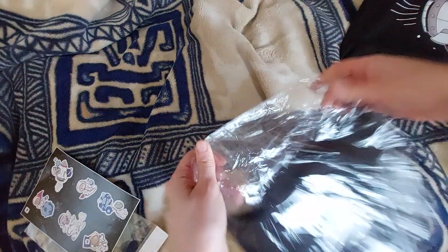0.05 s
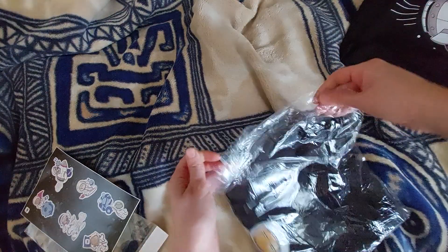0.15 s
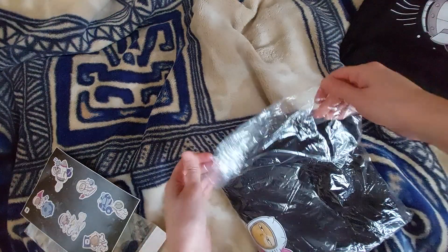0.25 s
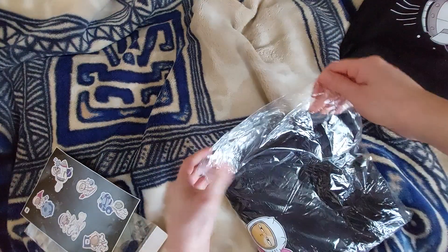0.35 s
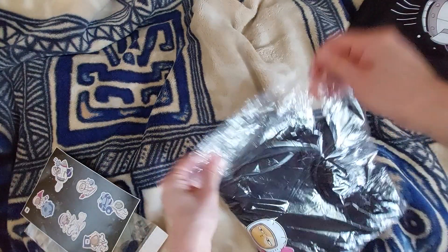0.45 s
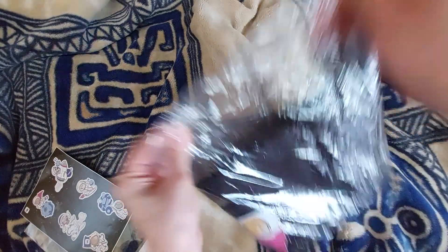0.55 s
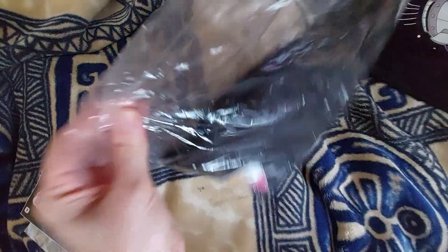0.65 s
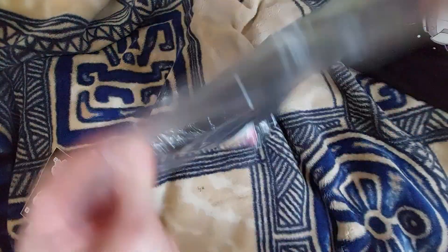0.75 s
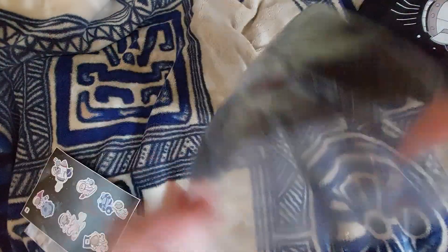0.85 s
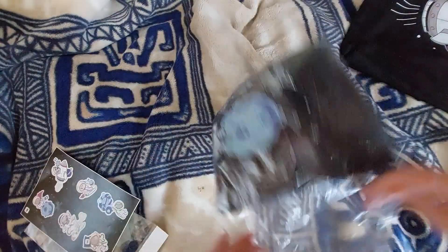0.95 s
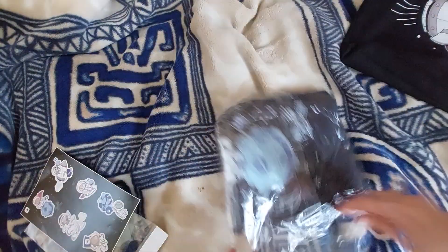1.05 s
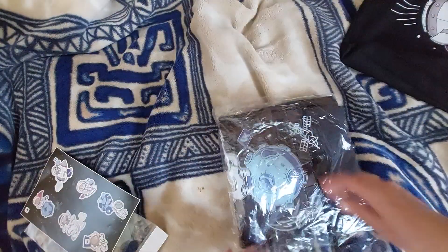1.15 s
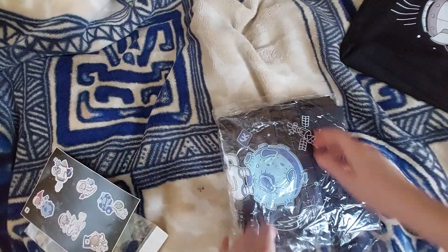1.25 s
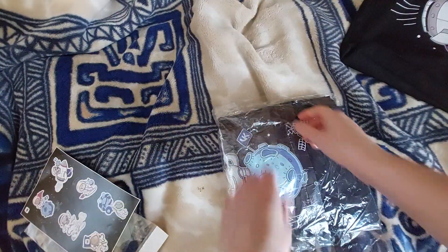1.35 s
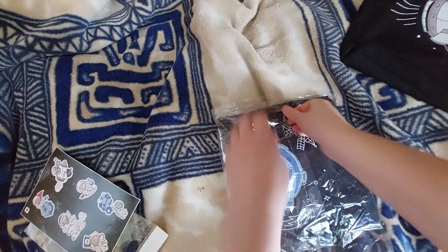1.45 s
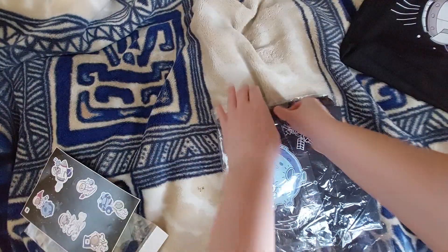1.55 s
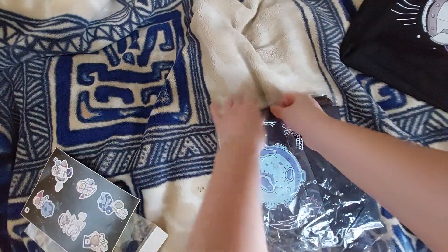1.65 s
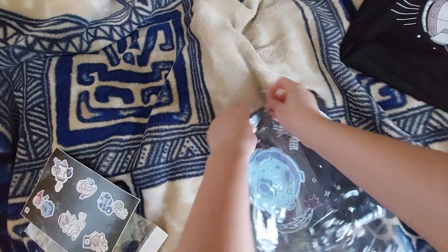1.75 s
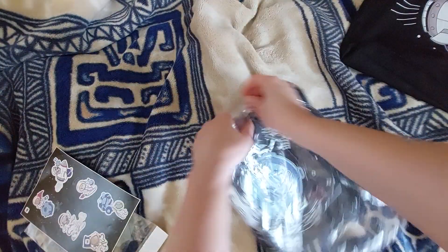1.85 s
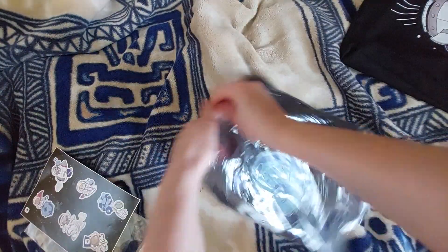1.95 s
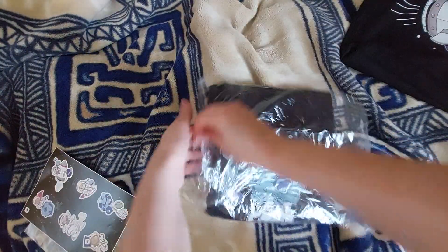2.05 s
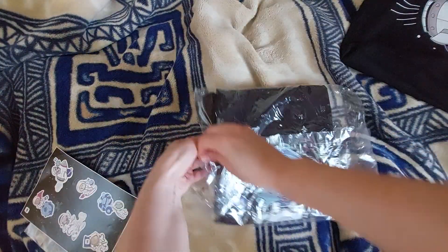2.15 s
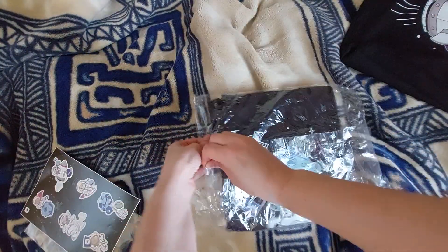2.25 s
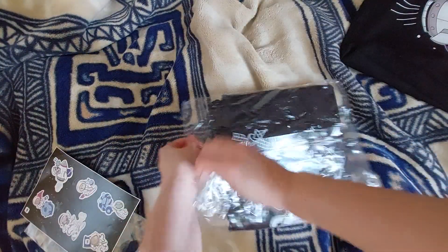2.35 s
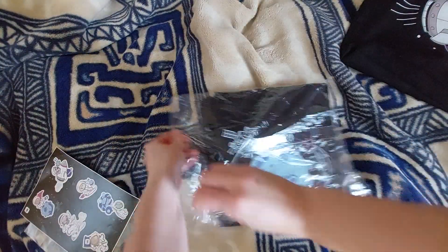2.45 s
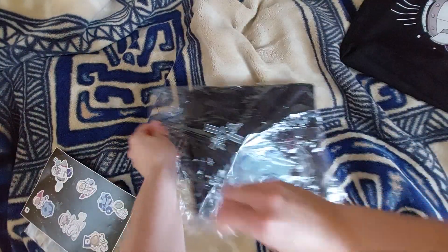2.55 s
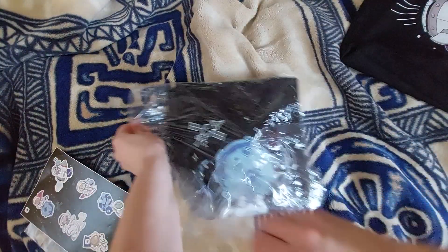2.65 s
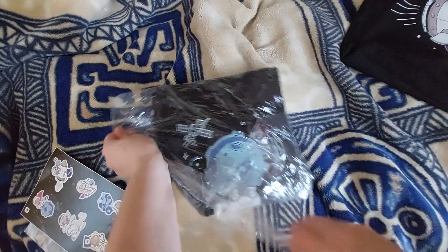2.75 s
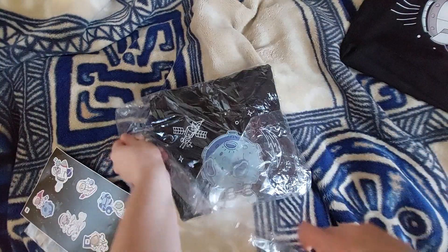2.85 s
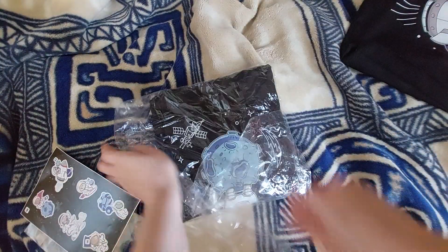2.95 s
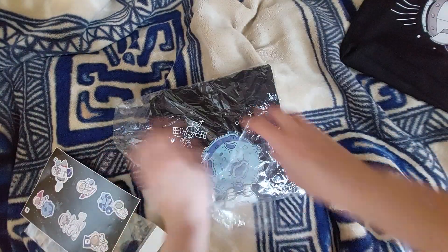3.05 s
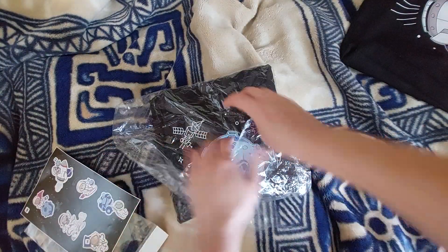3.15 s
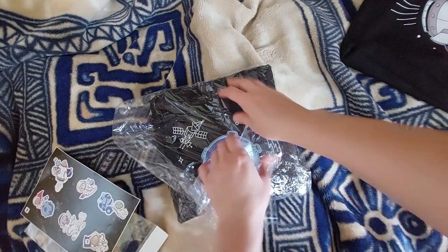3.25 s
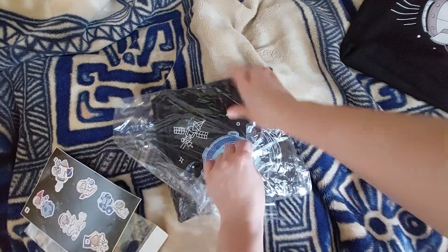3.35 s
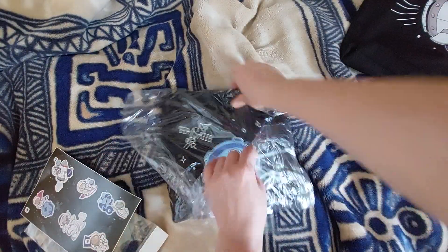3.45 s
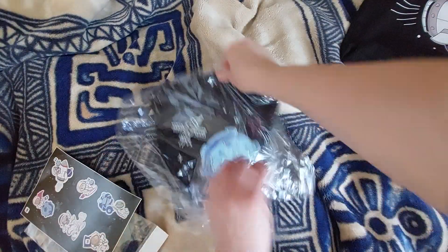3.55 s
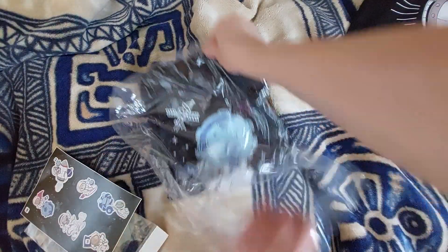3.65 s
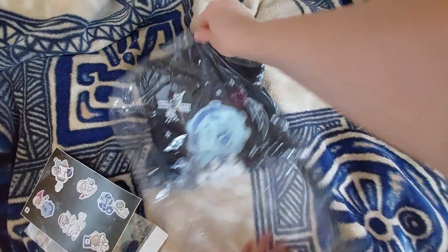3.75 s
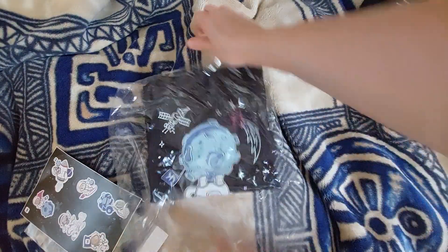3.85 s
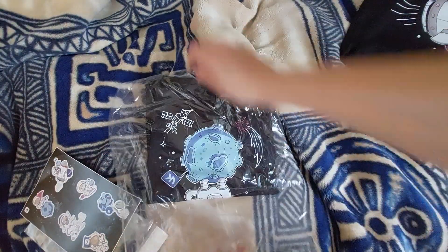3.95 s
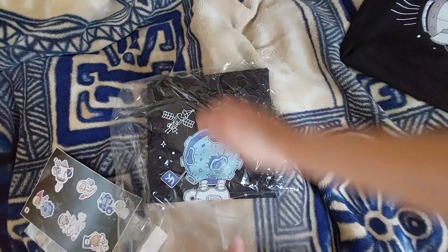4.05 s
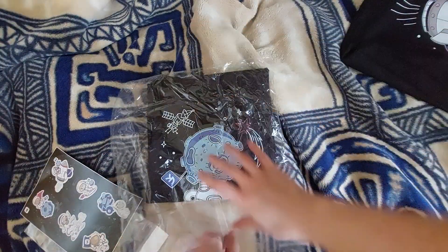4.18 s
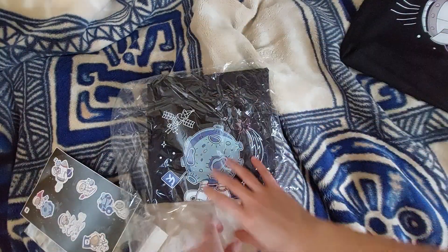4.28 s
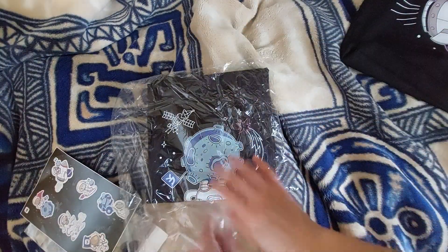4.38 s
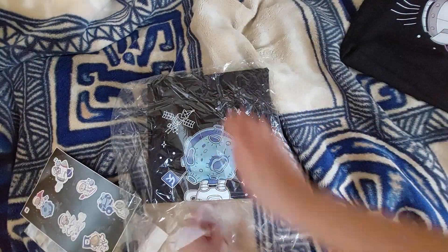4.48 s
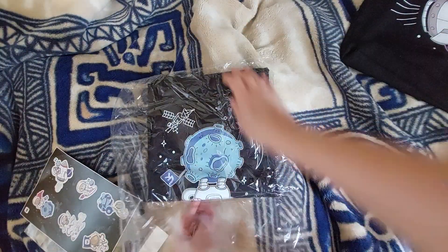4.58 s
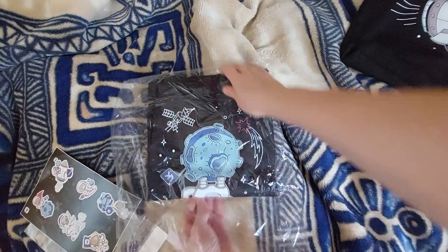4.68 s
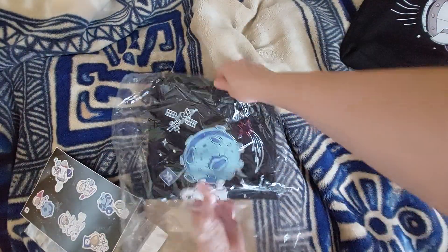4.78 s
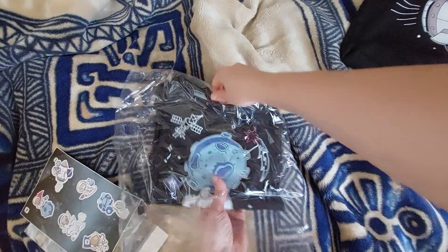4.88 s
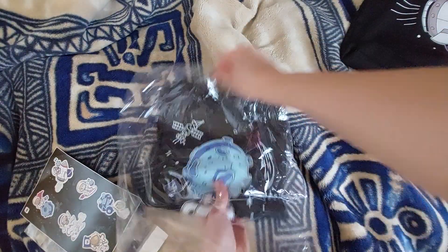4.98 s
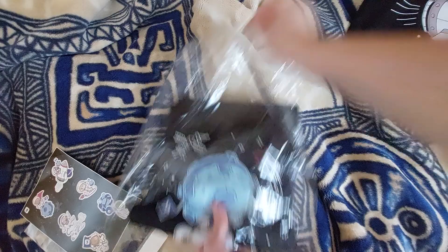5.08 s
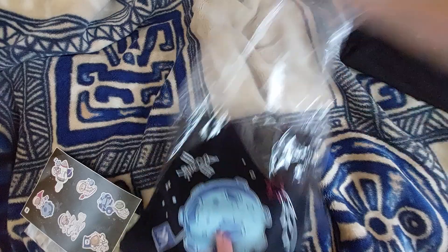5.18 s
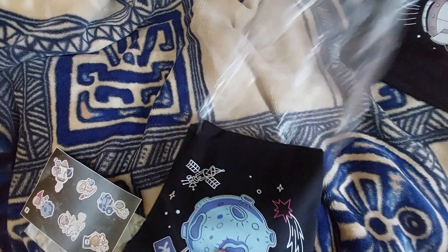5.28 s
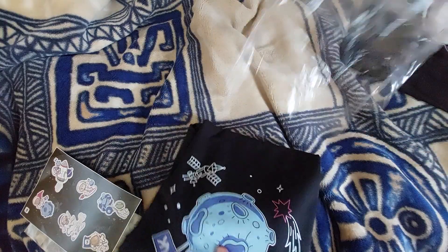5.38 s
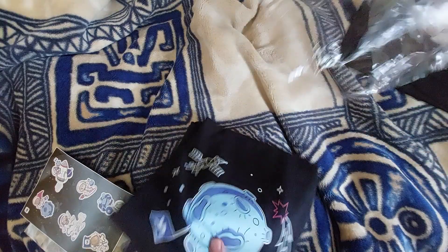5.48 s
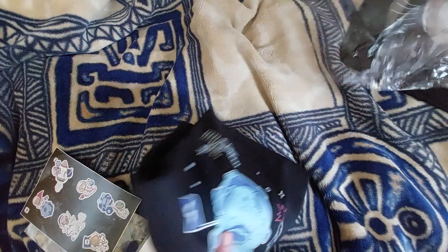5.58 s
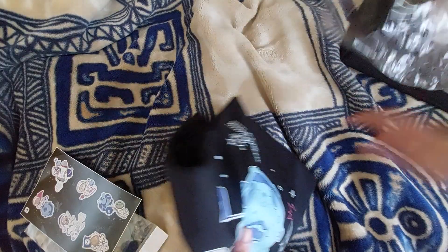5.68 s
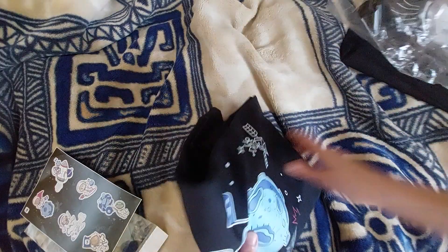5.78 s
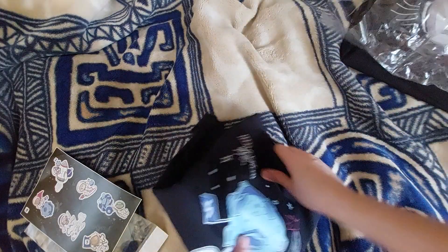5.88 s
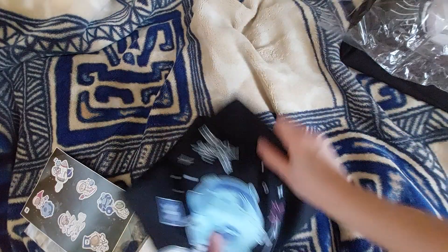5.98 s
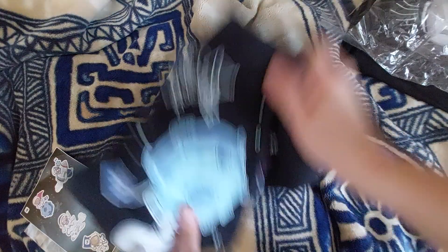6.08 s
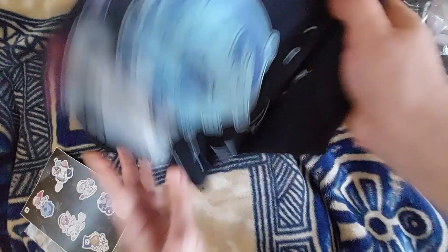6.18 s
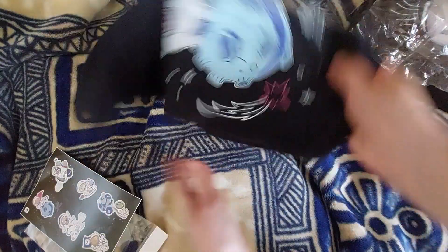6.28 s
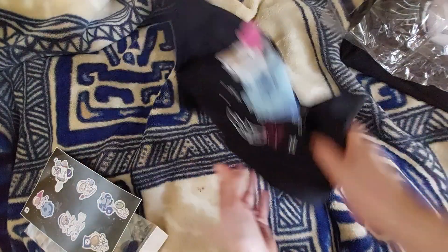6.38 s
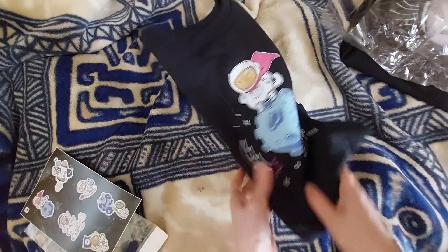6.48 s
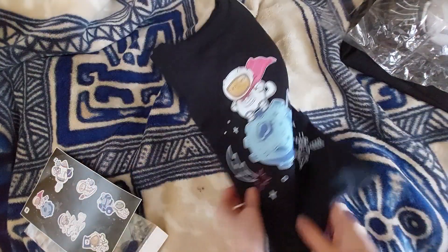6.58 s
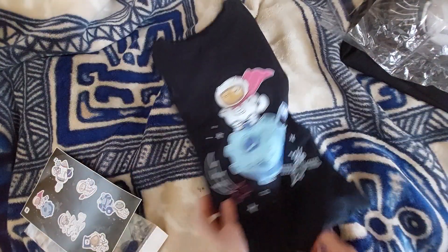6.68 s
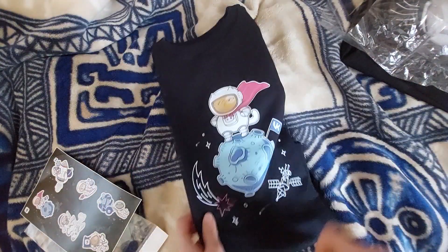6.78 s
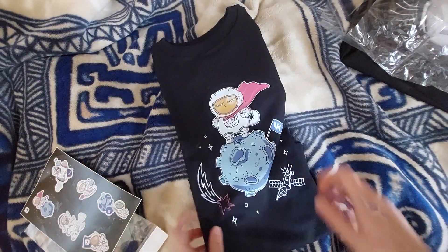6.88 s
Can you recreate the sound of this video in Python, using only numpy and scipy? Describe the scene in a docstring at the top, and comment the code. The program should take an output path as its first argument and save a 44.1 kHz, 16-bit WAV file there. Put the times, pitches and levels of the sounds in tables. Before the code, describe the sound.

Hands turn a thin plastic bag over on a bed, making bright, irregular crinkling with some sliding hiss. The glued flap peels open with a hollow pop and a cluster of sharp snaps. More tugging and lighter rustling follow as a shirt is drawn out. The crinkling dies away and the shirt is shaken open with soft, dull flaps and puffs of air. The sound is close and in stereo, in a small, damped bedroom.

```python
"""Unpacking a shirt

Hands turn a thin plastic bag over on a bed, pull a shirt out of it and shake the shirt open.
Creases buckle in clumps of tiny clicks, with single snaps and ticks from loud to faint; film slides
on film, broad folds flap and the glued flap pops open. Bag and cloth push soft puffs of air
at two close microphones in a small, damped bedroom."""
import sys
import numpy as np
from scipy import signal
from scipy.fft import rfft, irfft
from scipy.io import wavfile
from scipy.ndimage import uniform_filter1d, map_coordinates

SR = 44100
rng = np.random.default_rng(int(sys.argv[2]) if len(sys.argv) > 2 else 0)


def store_wav(level_fs):
    """Save 16-bit WAV to argv[1]."""
    pcm = np.round(np.clip(np.atleast_2d(level_fs), -1, 1) * 32767)
    wavfile.write(sys.argv[1], SR, pcm.T.astype(np.int16))


N = 305613
TIME = np.arange(N) / SR


def amp(db):
    """Turns decibels into a gain."""
    return 10 ** (np.asarray(db) / 20)


def unit(x):
    """Scales a signal to an average (rms) level of 1."""
    return x / np.sqrt(np.mean(x ** 2) + 1e-20)


def look_up(table, hz):
    """Reads between the rows of a table, along a log-frequency axis."""
    f, value = np.transpose(table)
    return np.interp(np.log(hz + 1), np.log(f + 1), value)


def colour(x, tone, size=2048):
    """Filters with the shape of a tone table, not its overall level; clicks keep their sharp start."""
    log_gain = np.log(amp(look_up(tone, abs(np.fft.fftfreq(size, 1 / SR)))))
    taps = np.fft.ifft(np.exp(signal.hilbert(log_gain).conj())).real
    return signal.oaconvolve(x, taps[None] / np.linalg.norm(taps), axes=1)[:, :x.shape[1]]


def drift(rate_hz):
    """A smooth random wobble, mostly slower than rate_hz."""
    hz = np.fft.rfftfreq(N, 1 / SR)
    return unit(irfft(rfft(rng.standard_normal(N)) / (1 + (hz / rate_hz) ** 2), N))


def steady(x, seconds):
    """Evens out slow changes of level and leaves the fine grain."""
    size = max(int(seconds * SR), 8)
    power = uniform_filter1d(uniform_filter1d((x ** 2).mean(0), size), size)
    return x / np.sqrt(abs(power) + 1e-9)


def add(mix, start_s, sound):
    """Mixes a stereo sound in at the given time."""
    part = mix[:, max(round(start_s * SR), 0):][:, :sound.shape[1]]
    part += sound[:, :part.shape[1]]


def noise(likeness, size=N):
    """Left and right noise, from unrelated (likeness 0) to the same (1)."""
    a, b = rng.standard_normal((2, size))
    return np.array([a, likeness * a + np.sqrt(1 - likeness ** 2) * b])


# Tone of the quiet room: f/Hz, level/dB
BACKGROUND_TONE = [(15, -16.5), (40, -10.5), (80, 8), (160, -6), (330, -1.5), (600, -16), (1200, -13),
                   (3000, -34.5), (15500, -27)]
def background(level_db=-68.5):
    """The room's faint, steady rumble and hiss."""
    return amp(level_db) * unit(colour(noise(0.43), BACKGROUND_TONE))


# How long the echo takes to fade by 60 dB: f/Hz, fade/s
ECHO_FADE = [(100, 0.15), (1000, 0.24), (5000, 0.039), (16000, 0.18)]
def bedroom(x, echo_db=-16.5, first_echo_s=0.012):
    """The walls add a short, weak echo that dies fastest in the treble."""
    hz, t, spectrum = signal.stft(noise(0.11, size=SR // 2), SR, nperseg=256)
    fade = amp(-60 * t / look_up(ECHO_FADE, hz)[:, None])
    tail = signal.istft(spectrum * fade, SR, nperseg=256)[1]
    tail *= np.arange(tail.shape[1]) > first_echo_s * SR
    return x + amp(echo_db) * signal.fftconvolve(x, tail / np.linalg.norm(tail[0]), axes=1)[:, :N]


# How far right the bag is, as the delay at the left microphone: t/s, delay/ms
BAG_PATH = [(0, 0.33), (.9, 0.34), (1.5, 0.25), (2.3, 0.1), (2.6, 0.11), (3.0, 0.14), (3.4, 0.16),
            (4.3, 0.18), (4.7, 0.065), (5.3, 0.11), (5.6, 0.49), (6.9, 0.24)]
def place(x, pan_db_per_ms=-12):
    """A bag further right is later and weaker at the left microphone."""
    delay_ms = np.interp(TIME, *np.transpose(BAG_PATH))
    left = map_coordinates(x[0], [np.arange(N) - delay_ms * SR / 1000], order=5)
    return np.array([left, x[1]]) * side_gains(pan_db_per_ms)


def side_gains(pan_db_per_ms):
    """Left and right gains that favour the microphone nearer the bag."""
    pan_db = pan_db_per_ms * np.interp(TIME, *np.transpose(BAG_PATH))
    return amp(np.array([pan_db, -pan_db]) / 2)


# Hand moves: turn the bag over, peel it open (2.3 s), tug (3.2 s), reach in (4.1 s),
# draw it off (4.7 s), shake the shirt (6.2 s). Rise and fall are the times to change by swell_db.
# t/s, hold/s, rise/s, fall/s, level/dB, extra folds/dB, extra air/dB, brightness/dB, sliding share/0-1
HAND_MOVES = [(0.0, 0.039, 0.051, 0.078, -34, 3.5, -2, 2.5, 0.35),
              (.147, 0.054, 0.082, 0.06, -26.5, 2.5, -2, 2, 0.63),
              (0.22, 0.059, 0.065, 0.25, -33.5, -5, 0.5, 2.5, 0.28),
              (0.485, 0.12, 0.17, 0.05, -34.5, 2, 3.5, 4.5, 0.21),
              (0.767, .11, 0.21, 0.085, -33.5, -2, 3, 3, 0.17),
              (0.91, 0.16, 0.14, 0.16, -36.5, 7, -3, 5, 0.22),
              (1.091, 0.043, 0.085, 0.061, -30, 3.5, -1, 3.5, 0.75),
              (1.179, 0.046, 0.025, 0.1, -39.5, -0.5, -5, 2, 0.33),
              (1.255, 0.071, 0.033, .025, -50, 1.5, 2, 1, .3),
              (1.457, 0.21, 0.19, .04, -48.5, 0.5, -2, 1, 0.1),
              (1.744, 0.22, 0.22, 0.054, -37, 1, -3.5, 1, 0.58),
              (2.065, 0.099, 0.37, 0.16, -36, 2.5, -2.5, 0, 0.33),
              (2.287, 0.16, 0.14, 0.091, -30, -0.5, -8, 3, 0.17),
              (2.353, 0.13, 0.0081, 0.042, -22.5, -1.5, -4, -5.5, 0.22),
              (2.512, .1, 0.01, 0.11, -24, -5, -5.5, 5.5, .25),
              (2.646, 0.069, 0.079, .125, -21, -5.5, -7, 5, 0.48),
              (2.794, 0.13, 0.093, 0.12, -40, 1.5, 1.5, 2, 0.35),
              (3.031, 0.056, .225, 0.14, -50.5, 1.5, -9, 1, 0.33),
              (3.214, .025, 0.054, 0.1, -47.5, -6, -9, 1, .4),
              (3.338, 0.42, 0.13, .064, -40, -2.5, -8, 1.5, 0.46),
              (3.546, 0.031, 0.054, 0.064, -21.5, -4, -10, -1.5, 0.4),
              (3.628, .018, .035, 0.019, -25, -0.5, -2, -1.5, 0.2),
              (3.71, .23, 0.2, 0.13, -38, 2, 3, 1, 0.34),
              (4.111, 0.0085, 0.022, 0.073, -52, 4, -4, 0, 0.06),
              (4.192, 0.14, 0.011, 0.13, -45, 2, 2.5, 2.5, 0.23),
              (4.529, 0.037, 0.042, 0.051, -56.5, 6, -1, -4, 0.23),
              (4.716, 0.19, 0.081, 0.1, -39, 0.5, -6, 1, 0.16),
              (4.856, 0.17, 0.06, 0.33, -37.5, 4.5, -4, 3.5, 0.44),
              (5.061, 0.17, 0.1, 0.16, -29.5, 1.5, 0.5, -1, 0.45),
              (5.28, 0.068, 0.14, 0.081, -33.5, -0.5, -1, 0.5, 0.2),
              (5.466, 0.086, 0.018, 0.12, -41, 0.5, 0, 0.5, 0.33),
              (5.659, 0.042, 0.018, .05, -50.5, -3, 1, -3.5, 0.34),
              (5.779, 0.039, 0.047, 0.17, -48, -2, 1.5, -1.5, 0.4),
              (6.166, .028, 0.097, 0.021, -53.5, -2, 11, 5, 0.56),
              (6.367, 0.34, .25, 0.16, -67.5, 2.5, 13.5, 5, 0.93)]
def hands(swell_db=20, rest_db=-81.5, steps=3500):
    """Blends the moves into curves of level, folds, air, brightness and sliding; the strongest leads."""
    t = np.linspace(0, N / SR, steps)
    start, hold, rise, fall, level_db, *traits = np.transpose(HAND_MOVES)[:, :, None]
    before = np.maximum(start - t, 0) / rise
    after = np.maximum(t - start - hold, 0) / fall
    power = amp(level_db - swell_db * (before + after)) ** 2
    total = power.sum(0) + 1e-30
    total_db = 10 * np.log10(total + amp(rest_db) ** 2)  # a faint stir stays between moves
    blends = [(trait * power).sum(0) / total for trait in traits]
    return [np.interp(TIME, t, curve) for curve in [total_db] + blends]


# Tone of pushed air: f/Hz, level/dB
PUFF_TONE = [(15, -27), (30, -5), (50, -0.5), (75, 2), (140, -0.5), (200, -5), (300, -5), (800, -53),
             (3000, -68)]
def air_puffs(push_db, gain_db=-17.5):
    """The moving bag and shirt push low, lumpy puffs of air."""
    return amp(push_db + gain_db) * steady(colour(noise(0.57), PUFF_TONE, size=8192), 0.047)


# Tone of flapping cloth: f/Hz, level/dB
CLOTH_TONE = [(20, -3), (50, 15.5), (120, 6), (200, -4), (300, -1.5), (450, -9), (1000, -20), (4000, -55)]
# Soft flaps of the shirt and the packed bag: t/s, relative peak/dB, time to peak/s
CLOTH_FLAPS = [(0.136, -38.5, 0.0067), (1.09, -38, 0.013), (2.428, -39, 0.025), (3.71, -48.5, 0.0066),
               (5.468, -52, 0.0081), (6.14, -51.5, 0.0089), (6.282, -55, 0.0076), (6.47, -48.5, 0.022),
               (6.535, -49.5, 0.006)]
def cloth_flaps(size=8192):
    """Shirt and bag thud dully as they land or pull tight."""
    out = np.zeros((2, N))
    for start_s, peak_db, swell_s in CLOTH_FLAPS:
        age = np.arange(size) / SR / swell_s
        thud = steady(colour(noise(1.0, size), CLOTH_TONE), 0.027)
        add(out, start_s, amp(peak_db) * age * np.exp(1 - age) * thud)
    return out


def buckle(ring_s, ring_db, likeness, ripple_db=2.5, spread_ms=0.073, size=1024):
    """One crease flips: a spike, and a brief shiver of the sheet."""
    t, hz = np.arange(size) / SR, np.fft.rfftfreq(size, 1 / SR)
    shiver = noise(likeness, size) * amp(-60 * t / ring_s)
    click = amp(ring_db) * shiver / np.linalg.norm(shiver[0])
    click[:, 0] += rng.choice([-1, 1])
    # each patch of film has its own tone and its own place between the microphones
    ripple = np.interp(np.sqrt(hz), np.linspace(0, np.sqrt(SR / 2), 22), rng.standard_normal(22))
    delay_s = np.array([[spread_ms * rng.standard_normal() / 1000], [0]]) + 24 / SR
    click = irfft(rfft(click) * amp(ripple_db * ripple) * np.exp(-2j * np.pi * hz * delay_s))
    return unit(click) / np.sqrt(size)


def swarm(per_s, spread_db, ring_s, ring_db, likeness, kinds=48):
    """Many creases flip at random; most are tiny, a few are large."""
    chance = rng.random(N)
    strength = amp(spread_db * np.minimum(rng.exponential(1, N), 3.9))
    kind = rng.integers(0, kinds, N)
    clicks = [buckle(ring_s, ring_db, likeness) for _ in range(kinds)]
    out = np.zeros((2, N))
    for k in np.flatnonzero(chance < per_s / SR):
        add(out, k / SR, strength[k] * clicks[kind[k]])
    return out


def flex(x, depth_db, seconds=0.05, width_hz=520):
    """The bag keeps changing shape, so broad bands of its sound come and go."""
    spectrum = signal.stft(x, SR, nperseg=256)[2]
    patches = rng.standard_normal(spectrum.shape[1:])
    patches = uniform_filter1d(patches, round(seconds * SR / 128), axis=1)
    patches = uniform_filter1d(patches, round(width_hz * 256 / SR), axis=0)
    return signal.istft(spectrum * amp(depth_db * unit(patches)), SR, nperseg=256)[1][:, :N]


# Tone of broad folds: f/Hz, level/dB
FOLD_TONE = [(30, -37), (100, -18), (170, -10), (260, 0.5), (370, 2.5), (480, -1), (650, -10), (1200, -30),
             (5000, -59.5)]
def broad_folds(per_s, clumps):
    """Whole folds flap over the air in the bag with a low flutter."""
    clicks = swarm(per_s, spread_db=4.5, ring_s=0.017, ring_db=-1.5, likeness=0.99)
    return steady(colour(clicks, FOLD_TONE) * amp(2.7 * clumps), 0.025)


# Tone of wide creases: f/Hz, level/dB
CRUNCH_TONE = [(150, -28), (450, -2.5), (650, 2.5), (820, 4), (1150, 4), (1500, 3), (2100, 3.5), (2700, -3),
               (4500, -15.5), (12000, -33)]
def wide_creases(per_s, clumps):
    """Wide creases buckle with a mid-pitched crunch."""
    clicks = swarm(per_s, spread_db=1.5, ring_s=0.02, ring_db=-2.0, likeness=0.85)
    crunch = colour(clicks, CRUNCH_TONE) * amp(2.0 * clumps)
    return steady(flex(crunch, depth_db=3.5), 0.028)


# Tone of rubbing film: f/Hz, level/dB
SLIDE_TONE = [(300, -26), (1300, -7), (2400, 2.5), (4200, 5), (6400, 2), (9400, -2.5), (12800, 1),
              (15400, -5), (17000, -17.5)]
def sliding_film(clumps):
    """Film slides on film with a nearly even hiss."""
    return steady(colour(noise(0.033), SLIDE_TONE) * amp(0.2 * clumps), 0.032)


# Tone of a crease's sharp click: f/Hz, level/dB
CREASE_TONE = [(300, -24), (1300, -15), (2400, 2.5), (3200, 2), (4600, 4.5), (6400, 2.5), (9400, -0.5),
               (12400, 1.5), (15400, -0.5), (16500, -18.5), (19000, -27.5)]
def tiny_creases(per_s, clumps):
    """Tiny creases buckle in clumps of bright clicks."""
    clicks = swarm(per_s, spread_db=4.0, ring_s=0.022, ring_db=-4.0, likeness=0.38)
    return steady(colour(clicks, CREASE_TONE) * amp(3.0 * clumps), 0.053)


def bag_rustle(level_db, folds_db, bright_db, sliding):
    """Creases, sliding film and folds together; harder handling flips more creases."""
    clumps = drift(rate_hz=39)
    per_s = 900 * amp(0.45 * (np.clip(level_db, -65, -20) + 38))
    film = np.sqrt(1 - sliding) * tiny_creases(per_s, clumps) + np.sqrt(sliding) * sliding_film(clumps)
    # taut film sounds brighter than slack film
    dull = signal.sosfiltfilt(signal.butter(2, 7000, fs=SR, output="sos"), film)
    film = amp(-bright_db / 2) * dull + amp(bright_db / 2) * (film - dull)
    crunch = amp(0.48 * folds_db - 6.0) * wide_creases(per_s + 900, clumps)
    folds = amp(folds_db - 12.5) * broad_folds(per_s + 500, clumps)
    crackle = steady(flex(film, depth_db=1.62), 0.15)
    return amp(level_db) * (crackle + crunch + folds)


# Tone of the hollow pop: f/Hz, level/dB
POP_TONE = [(80, -27.5), (200, -17), (300, 2), (600, 0.5), (1000, 3), (1500, 3), (2200, -4.5), (3200, -8.5),
            (8000, -36)]
def flap_pop(peak_s=2.3572, pop_db=-13.5, swell_s=0.0026, size=2048):
    """The glued flap lets go, and the taut panels pop over the air inside."""
    t = (np.arange(size) - size / 2) / SR
    burst = steady(colour(noise(0.97, size), POP_TONE), 0.003) * np.exp(-0.5 * (t / swell_s) ** 2)
    out = np.zeros((2, N))
    add(out, peak_s - size / 2 / SR, amp(pop_db) * burst)
    return out


# Tone of the panel around a snapping crease: f/Hz, level/dB
KNOCK_TONE = [(60, -32), (200, -12.5), (350, 1), (550, -2.5), (900, -2), (1400, 6), (2200, 0.5),
              (3500, -15), (9000, -36.5)]
# Single snaps and ticks of creases, from loud to faint:
# t/s, relative level/dB, extra knock/dB, share that runs along the crease/0-1
SNAPS_AND_TICKS = [(0.0315, -29.5, -5.5, .2), (0.1666, -30.5, -7, .6), (0.188, -28, -11, .3),
                   (0.6057, -27.5, -20.5, .2), (0.6101, -24, -21, .4), (.647, -34.5, -7, .2),
                   (0.7438, -31.5, -8, .4), (0.948, -31.5, -2, .3), (.9855, -33, 0, 0.9),
                   (1.421, -46, -15, .5), (1.5374, -50, -18, .3), (1.5789, -33.5, -25, .3),
                   (1.5932, -35.5, -3, .5), (1.658, -37, -7, .2), (1.841, -32, -22, .5),
                   (1.9067, -23, -11.5, 0.4), (2.1544, -30.5, -13, 0.5), (2.2556, -28, -1, .3),
                   (2.2817, -27, -17, .3), (2.289, -25, -19.5, .3), (2.3177, -21, -21, .3),
                   (2.327, -20, -3.5, .3), (2.353, -21.5, -14.5, .8), (2.3604, -17, -19, .6),
                   (2.375, -14.5, -11, .6), (2.4053, -22, -12, .7), (2.4157, -25, -4, 0.6),
                   (2.426, -24, -2, 0.6), (2.4412, -15.5, -9.5, .6), (2.458, -19, -18.5, 0.2),
                   (2.4654, -21, -9, 0.6), (2.4737, -20, -6.5, .7), (2.4825, -23, 3, 0.7),
                   (2.5001, -23.5, -1, 0.4), (2.5114, -22, 7.5, .8), (2.591, -23, -15, .7),
                   (2.9233, -48, 8, .5), (3.0806, -45.5, -2, .3), (3.2226, -37.5, -4, .6),
                   (3.2368, -42.5, 2.5, .2), (3.35, -27.5, -10, 0.7), (3.4992, -27.5, -9.5, .15),
                   (3.5327, -17, -7.5, 0.25), (3.5382, -23, -13.5, .5), (3.559, -17, -11, .6),
                   (3.594, -31, -17, .2), (3.608, -25, -13.5, .3), (3.6262, -18.5, -12.5, .6),
                   (3.9488, -31.5, -5, .3), (4.04, -48, -5, .3), (4.1142, -46, -9, .4),
                   (4.1965, -43, -15, .4), (4.2372, -31, -15, .4), (4.4528, -37.5, -6, 0.4),
                   (4.5239, -48, -1, .3), (4.5504, -51, -14, .2), (4.6615, -59, -4, .6),
                   (4.689, -35.5, -14, .4), (4.6953, -36.5, -6, .2), (4.7161, -36.5, -3, .4),
                   (4.748, -33, -9, .5), (4.8222, -31, -3.5, 0.5), (4.8818, -27, -9, 0.1),
                   (4.8888, -28, 0.5, .6), (4.944, -29.5, -5, .3), (5.448, -45.5, -3, .15),
                   (5.5527, -42, -15, 0.4), (5.6564, -45.5, -17, .6), (5.92, -57, -14, .3),
                   (6.0239, -46.5, -25, 0.25), (6.06, -61, -16, .3), (6.37, -63, -18, .3)]
def snaps_and_ticks(crack_db=1.0, knock_db=-5.0, ring_s=0.0092, run_s=0.033, span_s=0.0044):
    """Single creases give way, at once or in a short run: a bright crack and a knock of the panel."""
    out = np.zeros((2, N))
    for start_s, level_db, extra_db, run in SNAPS_AND_TICKS:
        run = np.clip(run, 0.15, 0.9)
        length_s = ring_s + run_s * run
        shiver_db = 10 * np.log10(run / (1 - run)) + 3.5
        # a crease that hardly moves its panel is a small one, and cracks thinner
        db_per_octave = 0.47 * np.clip(-extra_db - 2.5, 0, 16)
        thin_tone = [(hz, db + db_per_octave * np.log2(hz / 7000)) for hz, db in CREASE_TONE]
        crack = buckle(length_s, shiver_db, likeness=0.85, ripple_db=1.5)
        crack = amp(crack_db) * unit(colour(crack, thin_tone, size=512))
        knock = buckle(length_s, shiver_db + 0.5, likeness=0.63, ripple_db=-3.0)
        knock = amp(knock_db + extra_db) * unit(colour(knock, KNOCK_TONE, size=1024))
        snap = (crack + knock) * np.sqrt(span_s * SR / crack.shape[1])  # level counted over span_s
        add(out, start_s, amp(level_db) * snap)
    return out


def scene():
    """Bag, shirt and air in the room, over its faint background."""
    level_db, folds_db, air_db, bright_db, sliding = hands()
    bag = bag_rustle(level_db, folds_db, bright_db, sliding) + snaps_and_ticks() + flap_pop()
    air = air_puffs(level_db + air_db) + cloth_flaps()
    air *= side_gains(pan_db_per_ms=-7.2)  # air favours the nearer microphone still more
    return bedroom(place(bag + air)) + background()


# How much louder the left microphone is than the right: f/Hz, difference/dB
MIC_BALANCE = [(30, 0), (80, -1.5), (170, -5.5), (400, 0.5), (1300, -0.5), (2800, -1), (6000, -1),
               (9500, -2), (13000, 2), (16000, 2.5)]
def record(dry, low_cut_hz=53, high_cut_hz=16050):
    """Each microphone has its own tone; the deepest bass and highest treble are cut."""
    balance_db = look_up(MIC_BALANCE, np.fft.rfftfreq(N, 1 / SR))
    heard = irfft(rfft(dry) * amp(np.array([balance_db, -balance_db]) / 2), N)
    heard = signal.sosfilt(signal.butter(2, low_cut_hz, "high", fs=SR, output="sos"), heard)
    high_cut = signal.firwin(511, high_cut_hz, window=("kaiser", 9), fs=SR)
    return signal.oaconvolve(np.clip(heard, -1, 1), high_cut[None], "same")


dry = scene()
out = record(dry)
store_wav(out)
```